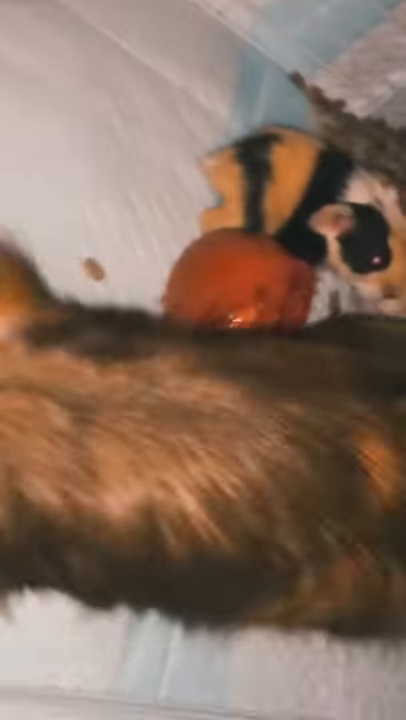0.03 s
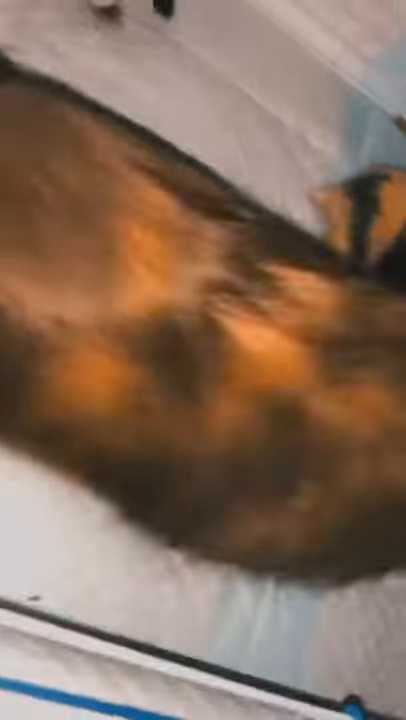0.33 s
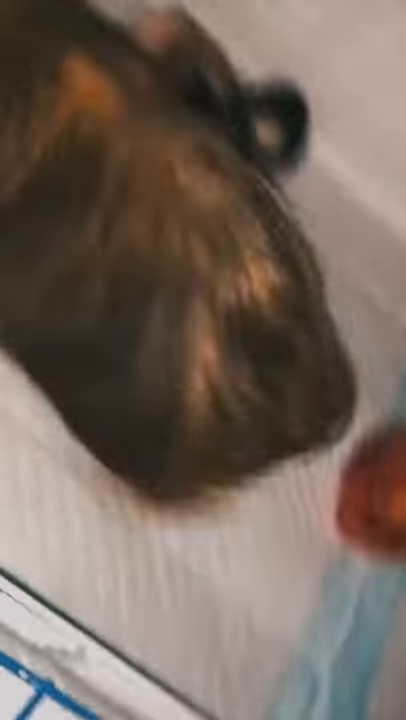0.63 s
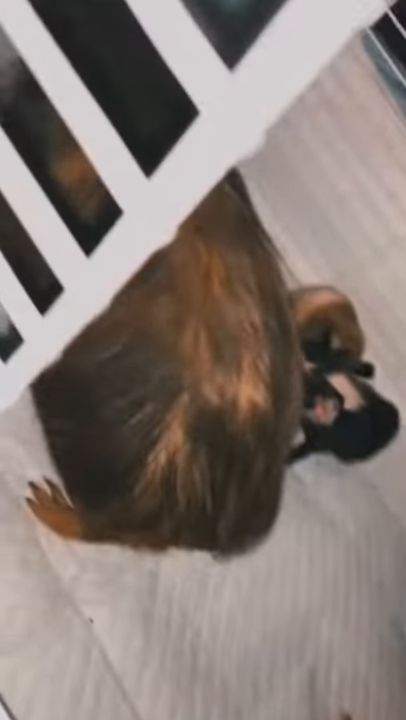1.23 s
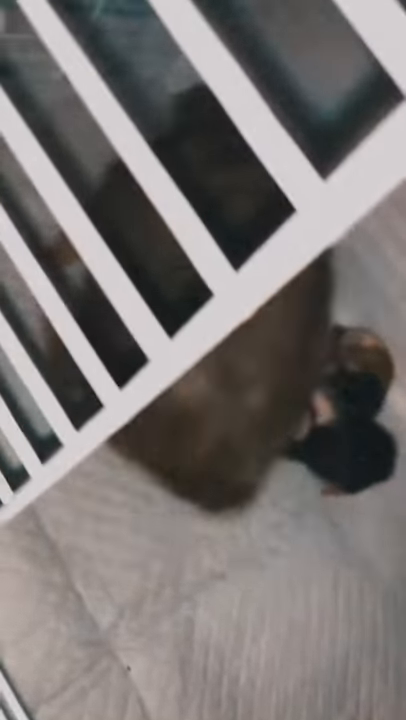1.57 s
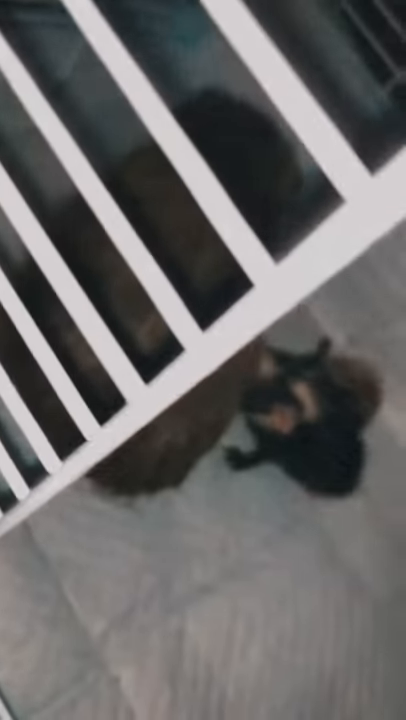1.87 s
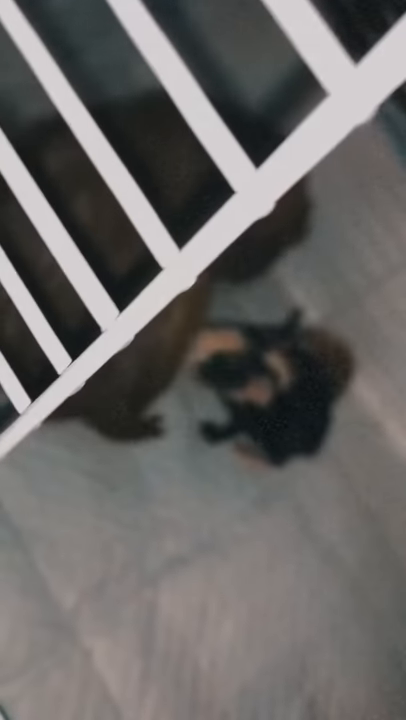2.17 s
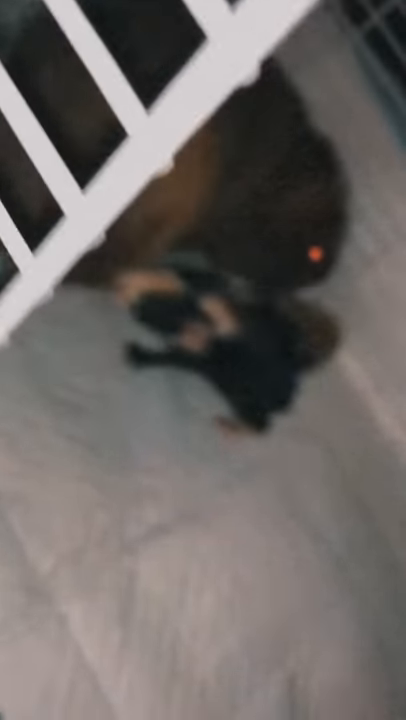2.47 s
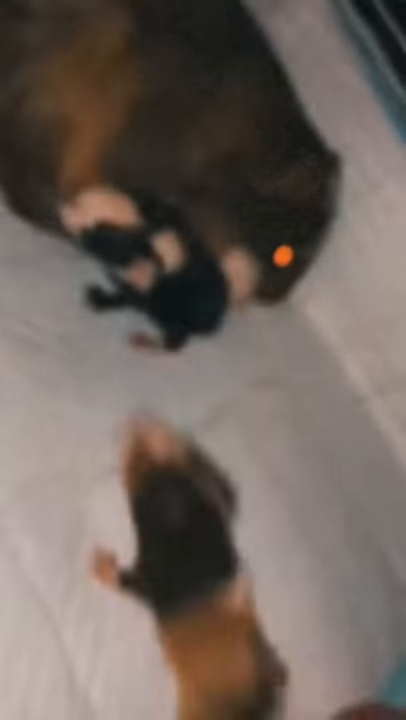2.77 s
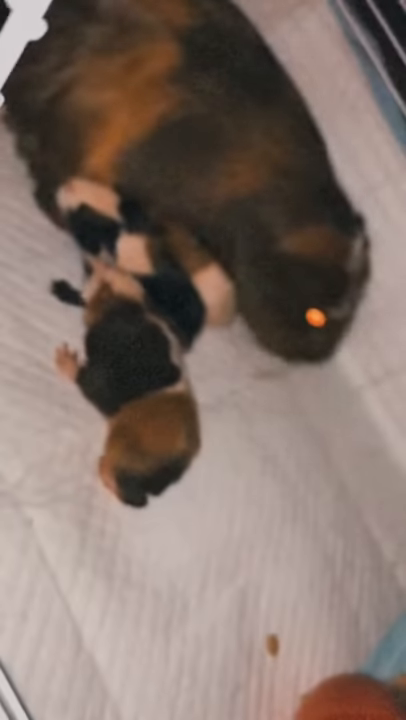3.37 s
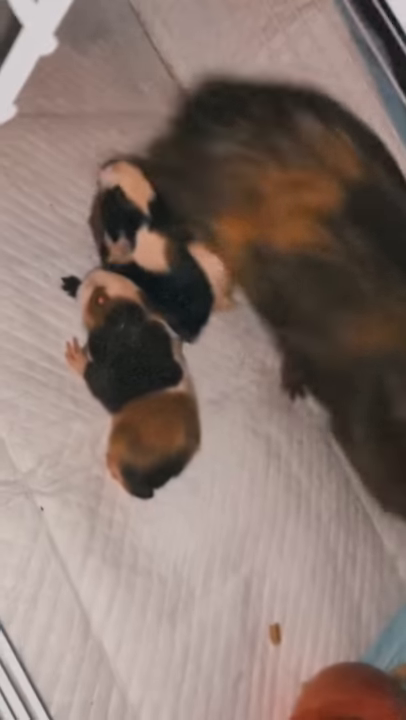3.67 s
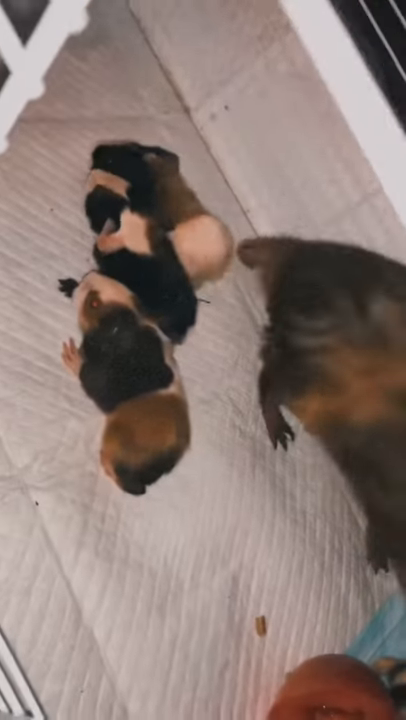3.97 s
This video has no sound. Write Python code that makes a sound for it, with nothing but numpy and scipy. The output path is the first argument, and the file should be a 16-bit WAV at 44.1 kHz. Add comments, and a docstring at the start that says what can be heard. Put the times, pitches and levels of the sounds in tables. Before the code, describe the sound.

Guinea pigs cluck softly and shuffle on a rustling paper pad, with tiny snaps, claw ticks and soft footfalls. The pen is knocked lightly at 0.4 seconds. Short, low clucks come around 0.6, 1.4, 2.3 and 3.5 seconds, then in a quick run near 3.8 seconds. A fan and a small compressor hum quietly in the room throughout.

```python
"""A fan and a small compressor hum throughout, behind a guinea pig and her pups in an indoor pen. They shuffle
on a paper pad: it rustles, its creases snap, feet thump softly and claws tick. At 0.4 s the pen is knocked
lightly, and the first short, soft, low clucks follow. More clucks, each a few cycles of a gliding, nearly pure
voice, come singly or in little groups amid the shuffling, and a quick run of them near 3.8 s ends the chatter."""
import sys
import numpy as np
from scipy import signal
from scipy.fft import rfft, irfft
from scipy.io import wavfile

SR = 44100
rng = np.random.default_rng(int(sys.argv[2]) if len(sys.argv) > 2 else 0)


def int16_out(signal):
    """Quantize to a 16-bit WAV file."""
    q = np.round(np.clip(np.atleast_2d(signal).T, -1, 1) * 32767)
    wavfile.write(sys.argv[1], SR, q.astype(np.int16))


N = 176400
T = np.arange(N) / SR


def from_db(db):
    """Decibels to gain."""
    return 10 ** (np.asarray(db) / 20)


def unit_rms(x):
    """Scale to unit power."""
    return x / np.sqrt(np.mean(x ** 2) + 1e-20)


def drift(rate_hz):
    """A smooth random wander of unit power, moving mostly slower than rate_hz."""
    hop, settle = 40, 2000
    pole = np.exp(-2 * np.pi * rate_hz * hop / SR)
    noise = rng.standard_normal(N // hop + settle + 2)
    slow = signal.lfilter([1], [1, -2 * pole, pole * pole], noise)[settle:]
    return np.interp(np.arange(N) / hop, np.arange(len(slow)), unit_rms(slow))


def colour(x, spectrum):
    """Shape a steady noise with an EQ curve of (Hz, dB) points; unit power."""
    hz, db = np.transpose(spectrum)
    bin_hz = np.maximum(np.arange(N // 2 + 1) * SR / N, 1)
    gain = from_db(np.interp(np.log(bin_hz), np.log(hz), db))
    return unit_rms(irfft(rfft(x) * gain, N))


def butterworth(x, hz, kind, order=2):
    """Low-pass or high-pass filter."""
    return signal.sosfilt(signal.butter(order, hz, kind, fs=SR, output="sos"), x)


def resonate(x, hz, width_hz):
    """One band-pass resonance."""
    r = np.exp(-np.pi * width_hz / SR)
    return signal.lfilter([1, 0, -1], [1, -2 * r * np.cos(2 * np.pi * hz / SR), r * r], x)


def ramp(u):
    """Smooth fade from 0 to 1."""
    return np.sin(np.pi / 2 * np.clip(u, 0, 1)) ** 2


def add(out, start_s, x):
    """Mix a sound in at a time."""
    i = max(int(start_s * SR), 0)
    out[i:i + len(x)] += x[:max(N - i, 0)]


def room_air():
    """Moving air lays a soft, dark bed of noise."""
    # EQ curve of the air: (frequency [Hz], relative level [dB])
    air_spectrum = [(20, -32), (35, -5.5), (48, -6.5), (65, 1), (95, -3.5), (125, -13), (160, 0.5),
                    (280, 0.5), (340, -8), (420, -6), (550, -15.5), (680, -19.5), (780, -15), (1080, -23.5),
                    (1300, -23), (1650, -29), (2000, -25), (2700, -36), (3700, -33), (5500, -40),
                    (7500, -41), (12500, -42.5), (15000, -95)]
    return from_db(-48.5) * colour(rng.standard_normal(N), air_spectrum)


def fan():
    """A fan hums in low tones that wander in level and phase."""
    # fan tones: (frequency [Hz], level [dB], width [Hz])
    fan_tones = [(79.6, -56, 1.9), (107.1, -58.5, 4.1), (133.94, -57, 1.83), (250.4, -60, 5.2),
                 (373.3, -59.5, 4.8)]
    out, waver = np.zeros(N), 0.28
    for hz, db, width_hz in fan_tones:
        phase = 2 * np.pi * hz * T
        tone = (1 + waver * drift(width_hz)) * np.sin(phase) + waver * drift(width_hz) * np.cos(phase)
        out += from_db(db) * unit_rms(tone)
    return out


def compressor():
    """A small compressor drones on harmonics of one steady rate, each wavering a little."""
    # compressor tones: (harmonic number, level [dB])
    harmonics = [(8, -68.5), (12, -75.5), (16, -75), (20, -74.5), (21, -75), (24, -73.5), (60, -80),
                 (64, -81.5)]
    running_hz, phase_wander_rad, level_waver = 59.05, 0.59, 0.32
    out = np.zeros(N)
    for number, db in harmonics:
        tone = np.sin(2 * np.pi * number * running_hz * T + phase_wander_rad * drift(rate_hz=1.74))
        out += from_db(db) * unit_rms(tone * (1 + level_waver * drift(rate_hz=3.5)))
    return out


def room_reverb(x):
    """The room answers with a short, dull, diffuse tail."""
    t60_s, build_s, dull_hz = 0.1, 0.0017, 6200
    t = T[:SR // 2]
    noise = butterworth(rng.standard_normal(len(t)), dull_hz, "low", order=1)
    tail = noise * from_db(-60 * t / t60_s) * ramp(t / build_s)
    return signal.fftconvolve(x, tail / np.sqrt(np.sum(tail ** 2)))[:N]


def pad_rustle():
    """Paper fibres snap in dense grains under each stroke, over a constant faint stirring."""
    # strokes of feet and fur: (centre time [s], half width [s], level [dB], treble boost [dB])
    strokes = [(.137, 0.01, -53, -11), (.20, 0.13, -66, -1), (.334, 0.0054, -56.5, 6),
               (.344, 0.0071, -57.5, 6), (.365, 0.032, -57, -5), (.49, 0.067, -66, -1),
               (.725, 0.053, -65.5, 2.5), (1.325, 0.028, -62.5, -5), (1.53, 0.037, -63, 0.5),
               (1.66, 0.016, -63, -9), (1.75, 0.018, -60.5, -16), (1.86, 0.0078, -69, 9.5),
               (2.01, 0.05, -62.5, -22), (2.036, .008, -62, 0), (2.29, 0.016, -64, 1),
               (2.43, 0.082, -73, 6.5), (2.65, 0.068, -62, -5), (2.812, 0.03, -54.5, -6.5),
               (2.86, 0.1, -65, -5), (3.297, 0.021, -57.5, -4), (3.318, 0.006, -55, -6),
               (3.336, 0.013, -68.5, 9.5), (3.385, 0.018, -68.5, 9.5), (3.495, .025, -62.5, -3),
               (3.812, 0.014, -61, 2)]
    # EQ curve of the paper pad: (frequency [Hz], relative level [dB])
    pad_spectrum = [(300, -9), (900, 8), (2000, 8), (3800, 2), (6000, 3), (9000, 0.5), (12500, 4.5),
                    (15000, -7.5)]
    grains_per_s, grain_spread_db, crossover_hz = 6000, 3.5, 4770
    stir_db, stir_swing_db = -73, 2.5
    grains = (rng.random(N) < grains_per_s / SR) * rng.choice([-1, 1], N)
    strength = from_db(grain_spread_db * np.minimum(rng.exponential(1, N), 5))
    paper = colour(grains * strength, pad_spectrum)
    body = butterworth(paper, crossover_hz, "low", order=1)
    treble = paper - body
    body_power = from_db(stir_db + stir_swing_db * drift(rate_hz=1.55)) ** 2
    treble_power = body_power.copy()
    for centre, half_width, db, treble_db in strokes:
        power = from_db(db) ** 2 * np.exp(-np.minimum(((T - centre) / half_width) ** 2, 60))
        body_power += power
        treble_power += power * from_db(treble_db) ** 2
    return body * np.sqrt(body_power) + treble * np.sqrt(treble_power)


def crease_snaps():
    """A crease in the pad flips over: one very short, bright crack."""
    # snapping creases, and the bright click of the light tap at 1.145 s: (time [s], level [dB], centre
    # frequency [Hz])
    creases = [(.179, -42, 11100), (0.332, -46, 9000), (1.145, -60, 5470), (1.4224, -50, 9500),
               (1.6005, -50, 10000), (1.747, -49.5, 9000), (1.789, -53.5, 5000), (2.02, -52, 5000),
               (3.687, -50, 6500)]
    decay_s = 0.00039
    out, t = np.zeros(N), T[:SR // 100]
    for start, db, hz in creases:
        crack = unit_rms(resonate(rng.standard_normal(len(t)), hz, width_hz=6000))
        add(out, start, from_db(db) * crack * np.exp(-t / decay_s))
    return out


def footfalls():
    """Weight lands on the padded floor with a soft, low thump."""
    # steps: (time [s], level [dB], pitch [Hz])
    steps = [(0.178, -36, 150), (.235, -41, 136), (0.6119, -33, 195), (0.677, -37, 71), (2.007, -38, 87)]
    rise_s = 0.0032
    out, t = np.zeros(N), T[:SR // 5]
    envelope = t / rise_s * np.exp(1 - t / rise_s)
    for start, db, hz in steps:
        add(out, start, from_db(db) * np.sin(2 * np.pi * hz * t) * envelope)
    return out


def claw_ticks():
    """A claw catches: a ring of a few cycles and a tiny scratch. The same sound also makes a sharp footfall
    click and a light tap."""
    # claw contacts, with a sharp footfall click at 0.604 s and a light tap at 1.146 s: (time [s], scratch level
    # [dB], pitch [Hz])
    catches = [(0.2136, -50.5, 2150), (.287, -57.5, 3600), (.604, -48, 950), (.606, -53, 3900),
               (.704, -61.5, 3120), (1.1464, -47.5, 1430), (1.489, -57, 2270), (1.979, -52.5, 2150),
               (2.017, -52.5, 2680), (2.433, -58.5, 2830), (2.641, -56.5, 3220), (2.79, -53, 2090),
               (2.832, -53.5, 2400), (3.3175, -53, 6600), (3.643, -58.5, 3570), (3.647, -53.5, 2240),
               (3.687, -60.5, 3500)]
    scratch_decay_s, scratch_q, crack_db = 0.0052, 4.6, -10
    ring_db, ring_decay_cycles = 4, 2.2
    out, t = np.zeros(N), T[:SR // 20]
    for start, db, hz in catches:
        burst = rng.standard_normal(len(t))
        crack = from_db(crack_db) * butterworth(burst, 1000, "high")
        scratch = unit_rms(resonate(burst, hz, hz / scratch_q)) + crack
        ring = from_db(ring_db) * np.sin(2 * np.pi * hz * t) * np.exp(-t * hz / ring_decay_cycles)
        add(out, start, from_db(db) * (ring + scratch * np.exp(-t / scratch_decay_s)))
    return out


def pen_knock(start_s):
    """A light knock on the pen: a sharp click, then its lower modes swell and die."""
    # modes of the pen: (frequency [Hz], level [dB], time to fall 60 dB [s], rise [s])
    pen_modes = [(3660, -30, 0.0048, 0.00015), (4370, -45, 0.0062, 0.00025), (6800, -44, 0.0068, 0.00028),
                 (902, -24, 0.02, 0.0053), (1480, -44.5, 0.031, 0.0018)]
    out, t = np.zeros(N), T[:SR // 10]
    for hz, db, t60, rise in pen_modes:
        add(out, start_s, np.sin(2 * np.pi * hz * t) * ramp(t / rise) * from_db(db - 60 * t / t60))
    return out


def clucks():
    """Each cluck is a short glide of a nearly pure voice; its overtones grow with the effort."""
    # calls: (time [s], length [s], start pitch [Hz], end pitch [Hz], level [dB],
    #         swell from start to end [dB], second harmonic against the first [dB])
    calls = [(0.576, 0.019, 687, 727, -43, -7, -4.5), (0.594, 0.0057, 665, 706, -41, -1.5, -10),
             (.653, 0.0092, 730, 740, -41.5, -3, -10), (1.4036, 0.017, 790, 823, -32.5, 11, -18),
             (1.714, 0.0085, 780, 740, -47, -5, -21), (2.2515, 0.01, 730, 746, -40, -1, -17),
             (2.313, 0.037, 687, 642, -42, -21, -10), (2.334, 0.028, 664, 673, -55, -9, 3),
             (3.5346, 0.037, 635, 603, -32, -1.5, -12.5), (3.7384, 0.018, 729, 656, -40, 1, -13),
             (3.759, 0.013, 646, 694, -37.5, -2, -18), (3.771, 0.012, 703, 770, -38.5, 0, -14),
             (3.777, 0.035, 833, 700, -49, 6, -24)]
    attack_s, release_s, arch_db = 0.001, 0.004, 7
    third_base_db, pitch_jitter = -18, 0.02
    out, waver = np.zeros(N), drift(rate_hz=140)
    for start, length, start_hz, end_hz, db, swell_db, second_db in calls:
        t = T[:int((length + release_s / 2) * SR)]
        progress = t / t[-1]
        glide_hz = start_hz + (end_hz - start_hz) * progress
        hz = glide_hz * (1 + pitch_jitter * waver[int(start * SR):][:len(t)])
        phase = 2 * np.pi * np.cumsum(hz) / SR
        contour_db = swell_db * (progress - 0.5) - arch_db * (2 * progress - 1) ** 2
        effort = ramp(t / attack_s) * ramp((t[-1] - t) / release_s) * from_db(contour_db)
        second = np.sqrt(effort) * from_db(second_db) * np.sin(2 * phase)
        third = effort * from_db(third_base_db + second_db / 2) * np.sin(3 * phase)
        add(out, start, from_db(db) * effort * (np.sin(phase) + second + third))
    return out


def scene():
    """The animals in their pen, the room around them, in mono."""
    voices = clucks()
    contacts = pad_rustle() + claw_ticks() + crease_snaps() + pen_knock(start_s=0.4118) + footfalls()
    # the clucks are made close to the soft floor, so they get the smaller reverb send
    reverb = room_reverb(from_db(-18) * voices + from_db(-13.5) * contacts)
    background = room_air() + fan() + compressor()
    return (voices + contacts + reverb + background)[None]


def record(dry):
    """Two steep low-pass filters roll off the very top."""
    soft = butterworth(dry, 13200, "low", order=12)
    return signal.sosfilt(signal.cheby2(14, 60, 15600, fs=SR, output="sos"), soft)


dry = scene()
out = record(dry)
int16_out(out)
```